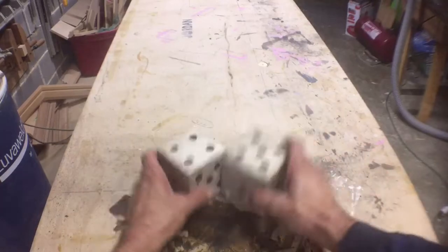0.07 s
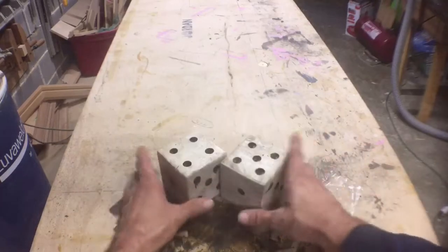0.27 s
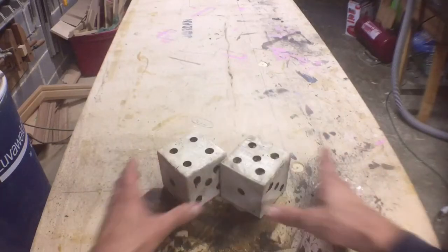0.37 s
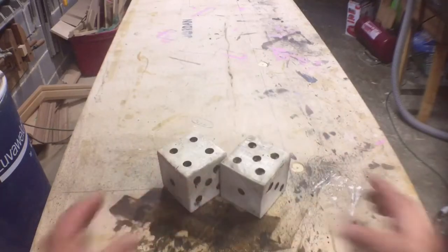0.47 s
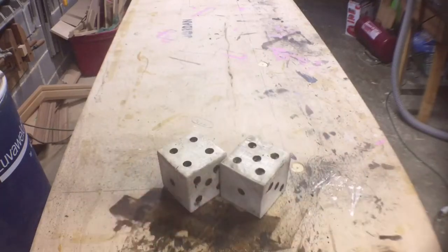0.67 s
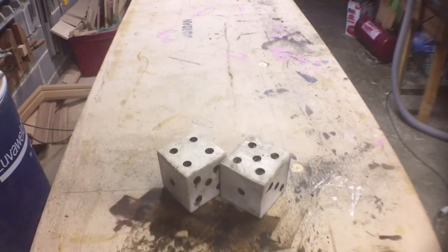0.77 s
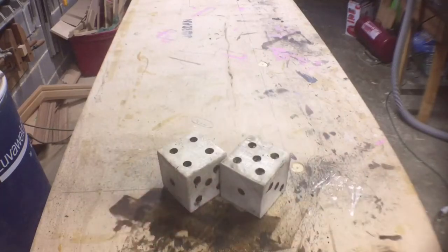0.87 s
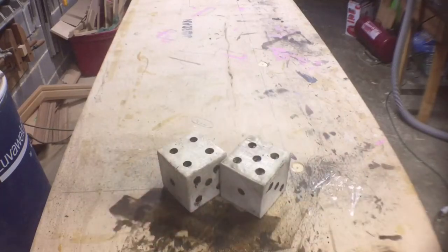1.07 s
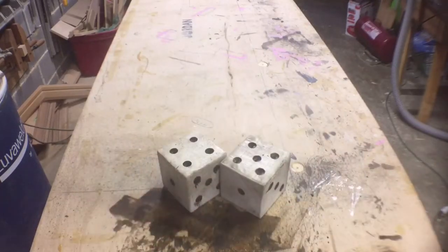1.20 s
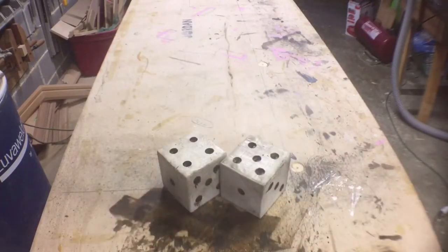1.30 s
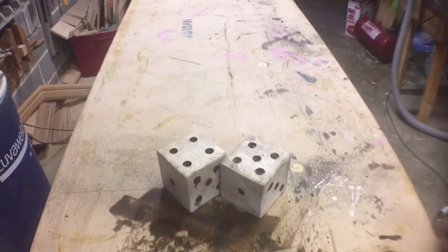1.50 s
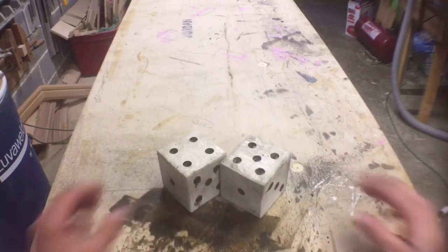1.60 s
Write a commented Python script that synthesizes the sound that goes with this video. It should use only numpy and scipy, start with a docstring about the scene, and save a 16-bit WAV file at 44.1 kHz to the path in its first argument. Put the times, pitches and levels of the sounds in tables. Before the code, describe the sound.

Two large wooden dice land on a bench with a sharp, briefly rattling knock.

```python
"""A small workshop: two big wooden dice are set down hard on a bench, one just after the other.
A sleeve brushes, edges touch and scuff, then the dice land and rattle flat. Each contact clacks the
blocks, booms the bench top and briefly rings the room; the peaks overload the microphone.
Soft bumps follow as the hands leave, over faint rustle, rumble, hiss, hum and a thin whine."""
import sys
import numpy as np
from scipy import signal
from scipy.fft import rfft, irfft
from scipy.io import wavfile

SR = 44100
rng = np.random.default_rng(int(sys.argv[2]) if len(sys.argv) > 2 else 0)


def unload_wav(signal):
    """Save mono or channel-first audio to the path in sys.argv[1] as 16-bit WAV at rate SR, clipped to [-1, 1]."""
    wavfile.write(
        sys.argv[1],
        SR,
        np.round(np.clip(np.atleast_2d(signal).T, -1, 1) * 32767).astype(np.int16),
    )


N = 72765

# Noise spectra. Each row: frequency in Hz, relative density in dB.
RUMBLE_SPECTRUM = [(20, -7), (55, 3), (120, 0.5), (200, -8.5), (350, -17), (600, -19.5), (1100, -26.5),
                   (3000, -32.5), (4200, -22.5), (5200, -43.5), (16000, -49.5)]
HISS_SPECTRUM = [(100, -2), (2000, 3.5), (4200, -0.5), (6500, -3), (8000, -5.5), (10500, -6.5), (13000, 0),
                 (16000, -5.5)]
RUSTLE_SPECTRUM = [(60, -14.5), (200, -9.5), (360, 4), (520, -11.5), (800, -9), (1300, -19), (4200, -26),
                   (6000, -36), (16000, -53)]
SCUFF_SPECTRUM = [(60, -9), (200, 3.5), (800, -2), (1200, -10.5), (2300, -17), (3100, -11.5), (4500, -17),
                  (5600, -24.5), (7500, -41), (16000, -48.5)]
# Noise envelopes. Each row: time in seconds, level in dB.
RUMBLE_ENVELOPE = [(0, -60), (0.751, -56.5), (.93, -59.5), (1.02, -59), (1.65, -59)]
HISS_ENVELOPE = [(0, -63.5), (0.199, -62.5), (0.449, -62.5), (.6, -57.5), (0.69, -58.5), (0.699, -68),
                 (1.52, -68), (1.63, -63.5)]
RUSTLE_ENVELOPE = [(0, -73), (.101, -71.5), (.68, -61), (.8, -75), (.9, -75.5), (1.05, -64.5),
                   (1.181, -71.5), (1.28, -68), (1.46, -64), (1.54, -76), (1.63, -67)]
SCUFF_ENVELOPE = [(.181, -71), (0.185, -40.5), (.2, -46.5), (.212, -43), (.226, -34.5), (0.239, -73)]
# Whine pitch. Each row: time in seconds, frequency in Hz.
WHINE_PITCH = [(0, 4450), (.8, 4401), (1.65, 4374)]

# Dense ringing of early echoes, late reverb and blocks. Each row: frequency in Hz, T60 in seconds.
EARLY_DECAY = [(80, 0.59), (280, 0.3523), (600, 0.278), (1100, 0.2342), (3500, 0.1805), (7000, 0.3065),
               (14000, 0.07)]
LATE_DECAY = [(100, 0.36), (300, 0.9462), (1000, 0.66), (4000, 0.3691), (12000, 1.5)]
WOOD_DECAY = [(100, 0.094), (600, 0.013), (3000, .027), (10000, .013)]
# Their spectra. Each row: frequency in Hz, gain in dB.
EARLY_SPECTRUM = [(100, -3.5), (400, -6), (1200, -0.5), (4000, -5), (12000, -1)]
LATE_SPECTRUM = [(100, -20.5), (280, -26.5), (550, -31), (1100, -23.5), (4000, -23.5), (6000, -31.5),
                 (12000, -29)]
WOOD_SPECTRUM = [(30, -9.5), (110, 13), (270, 26.5), (650, 26), (800, 21.5), (1100, 24), (1900, 19),
                 (3100, 15), (4200, 17.5), (4900, 5), (6800, 3), (7700, -9.5), (13500, -4), (16000, -16)]

# Resonances. Each row: frequency in Hz, level in dB, T60 in seconds.
BUMP_MODES = [(100, -6.5, 0.062), (281.14, -10.5, 0.0624), (318.2, 4, 0.0362), (479.14, -12, 0.055),
              (633.9, -1.5, 0.031), (822, -27.5, 0.82), (978, 3, 0.0307), (1049, -18.5, 0.0196),
              (2077.3, -7, .028)]
TOUCH_MODES = [(310, -10.5, .03), (470, 2, 0.0057), (660, 0, .015), (846.07, -1, 0.0096),
               (1550, -5, 0.0098), (3030, -1, .011), (4564.6, -6, 0.023), (5240, -8.5, 0.0053),
               (6420, -12.5, .011)]
BENCH_MODES = [(61.007, -40, 0.66145), (95.5, -30.5, 0.3), (120.98, -33.5, .42), (175.7, -32.5, 0.42),
               (191.49, -31, 0.36), (260.4, -23, 0.18), (285.33, -20, .24), (329.45, -15.5, 0.23),
               (387.4, -17, .22), (414.18, -17.5, .18), (583.44, -22.5, 0.17), (692.15, -21, .19),
               (877.4, -25, 0.21), (985.9, -23.5, 0.1685)]
BLOCK_MODES = [(1083.6, -25, 0.23), (1087.7, -26.5, 0.1733), (1401, -22, 0.17), (1530, -24.5, .094),
               (1759.4, -27.5, .13), (2382, -19.5, 0.022), (3127, -18.5, .06), (3248, -14.5, 0.034),
               (3938.6, -28.5, .08), (4358, -23, .03)]

# Touches before landing, bumps after. Each row: start in seconds, low gain in dB, high gain in dB.
TOUCHES = [(.1817, -27.5, -28), (.1925, -32, -47.5), (.2165, -32, -48), (.2225, -23.5, -43)]
BUMPS = [(.5778, -40, -38.5), (.6325, -30, -38), (.778, -45, -62.5), (1.461, -51.5, -64)]
# Dice hitting the bench and each other.
# Each row: start in seconds, then thud, body, knock, clack and tick gains in dB.
CONTACTS = [(.2267, -11, -6.5, -1.5, 2.5, -0.5), (.2294, 2, 2, 1.5, -4, -4.5),
            (0.2371, 3, -1, 0.5, -1.5, -14.5), (0.247, -11.5, -2, 1.5, 8.5, -1),
            (0.2509, -5.5, 2.5, 3, 3.5, 2), (0.2538, 0.5, 1, 2.5, -10, -14.5),
            (0.2588, 1, 2, -0.06, -9, -10), (0.2622, 0.5, 2, -0.24, -4, -7),
            (.2692, 5.5, 2.5, -1.5, -8.5, -8.5), (0.2732, -1.5, -1.5, -5, -10.5, -14),
            (0.29, -8.5, -14.5, -14, -22.5, -25), (0.301, -14, -13.5, -13.5, -5, -19)]
# Frequencies of thud, body, knock, clack and tick in Hz.
CONTACT_BANDS_HZ = [220, 620, 1150, 3400, 10000]


def amp(db):
    """Decibels to gain."""
    return 10 ** (np.asarray(db) / 20)


def unit_rms(x):
    """Scales to RMS 1."""
    return x / np.sqrt(np.mean(x ** 2) + 1e-20)


def lookup(points, hz):
    """Interpolates a table over log frequency."""
    points_hz, values = np.transpose(points)
    return np.interp(np.log(hz + 1), np.log(points_hz + 1), values)


def add(mix, start_s, sound):
    """Mixes a sound in at start_s."""
    part = mix[round(start_s * SR):][:len(sound)]
    part += sound[:len(part)]


def colour(x, spectrum, size=4096):
    """Minimum-phase filter through (Hz, dB) points."""
    log_gain = np.log(amp(lookup(spectrum, abs(np.fft.fftfreq(size, 1 / SR)))))
    response = np.exp(np.conj(signal.hilbert(log_gain)))
    impulse = np.fft.ifft(response).real[:size // 2]
    return signal.fftconvolve(x, impulse)[:len(x)]


def shaped_noise(spectrum, envelope):
    """Coloured noise under a level curve."""
    level_db = np.interp(np.arange(N) / SR, *np.transpose(envelope))
    return amp(level_db) * unit_rms(colour(rng.standard_normal(N), spectrum))


def ring(modes, size=24576):
    """Decaying sines of a struck object."""
    t = np.arange(size) / SR
    return sum(amp(db - 60 * t / t60_s) * np.sin(2 * np.pi * hz * t) for hz, db, t60_s in modes)


def dense_ring(decay, size=32768, bands=14):
    """Countless modes: noise bands, each with its own T60 and its share of a unit click's energy."""
    t, hz = np.arange(size) / SR, np.fft.rfftfreq(size, 1 / SR)
    noise, out = rfft(rng.standard_normal(size)), np.zeros(size)
    edges_hz = np.geomspace(40, SR / 2, bands + 1)
    for low_hz, high_hz in zip(edges_hz, edges_hz[1:]):
        t60_s = lookup(decay, np.sqrt(low_hz * high_hz))
        band = irfft(noise * (hz >= low_hz) * (hz < high_hz)) * amp(-60 * t / t60_s)
        out += unit_rms(band) * np.sqrt(2 * (high_hz - low_hz) / SR / size)
    return out


def background(whine_db=-71, hum_hz=118, hum_db=-69):
    """Room rumble, hiss, a slightly sinking whine and electric hum."""
    t = np.arange(N) / SR
    rumble = shaped_noise(RUMBLE_SPECTRUM, RUMBLE_ENVELOPE)
    hiss = shaped_noise(HISS_SPECTRUM, HISS_ENVELOPE)
    whine_hz = np.interp(t, *np.transpose(WHINE_PITCH))
    whine = amp(whine_db) * unit_rms(np.sin(2 * np.pi * np.cumsum(whine_hz) / SR))
    hum = amp(hum_db) * unit_rms(np.sin(2 * np.pi * hum_hz * t))
    return rumble + hiss + whine + hum


def late_reverb(x):
    """The workshop's faint reverberant tail."""
    return signal.fftconvolve(x, colour(dense_ring(LATE_DECAY), LATE_SPECTRUM))[:N]


def early_echoes(delay_s=0.008):
    """Impulse response of the clutter around the bench, new for each spot struck."""
    echoes = colour(dense_ring(EARLY_DECAY, size=16384), EARLY_SPECTRUM)
    return np.pad(echoes, (round(delay_s * SR), 0))


def hand_rustle():
    """Low rustle of moving hands."""
    return shaped_noise(RUSTLE_SPECTRUM, RUSTLE_ENVELOPE)


def sleeve_swish(peak_s=0.1417, sigma_s=0.0168, centre_hz=4303, half_width_hz=320, level_db=-56.5):
    """Cloth brushes as the dice come down: a brief swell of narrow-band noise."""
    t, hz = np.arange(N) / SR, np.fft.rfftfreq(N, 1 / SR)
    band_gain = 1 / (1 + ((hz - centre_hz) / half_width_hz) ** 2)
    noise = irfft(rfft(rng.standard_normal(N)) * band_gain, N)
    swell = np.exp(-0.5 * ((t - peak_s) / sigma_s) ** 2)
    return amp(level_db) * unit_rms(noise) * swell


def edge_scuff():
    """An edge scrapes the bench between first touch and landing."""
    return shaped_noise(SCUFF_SPECTRUM, SCUFF_ENVELOPE)


def light_taps(events, modes, high_hz, rise_s, echo_db, low_hz=220):
    """Light contacts build up briefly, ring one set of modes and echo."""
    out, ringing = np.zeros(N), ring(modes)
    t = np.arange(len(ringing)) / SR
    ringing *= 1 - np.exp(-t / rise_s)
    for start_s, low_db, high_db in events:
        tap = colour(ringing, [(low_hz, low_db), (high_hz, high_db)])
        add(out, start_s, tap)
        add(out, start_s, amp(echo_db) * signal.fftconvolve(tap, early_echoes()))
    return out


def dice(snap_gain=0.95, snap_decay_s=0.0011):
    """Each contact cracks, rings the blocks and shakes the bench; edges are bright, faces dull."""
    out, modes = np.zeros(N), ring(BENCH_MODES) + ring(BLOCK_MODES)
    t = np.arange(len(modes)) / SR
    for start_s, *gains_db in CONTACTS:
        snap = rng.standard_normal(len(t)) * np.exp(-t / snap_decay_s)
        blow = snap_gain * unit_rms(snap) / np.sqrt(len(t))
        add(blow, 0, dense_ring(WOOD_DECAY, size=4096))
        add(blow, 0, early_echoes())
        contact = colour(blow, WOOD_SPECTRUM) + modes
        add(out, start_s, colour(contact, list(zip(CONTACT_BANDS_HZ, gains_db))))
    return out


def scene():
    """Mono mix of dice, handling sounds and room."""
    wood = light_taps(TOUCHES, TOUCH_MODES, high_hz=3000, rise_s=0.0005, echo_db=-5)
    wood += edge_scuff()
    wood += dice()
    wood += light_taps(BUMPS, BUMP_MODES, high_hz=1200, rise_s=0.00049, echo_db=-2.5)
    return (wood + late_reverb(wood) + sleeve_swish() + hand_rustle() + background())[None]


def record(dry):
    """Microphone: bass cut, soft overload, band limit."""
    low_cut_hz, high_cut_hz = 36, 16000
    drive_db, ceiling = -2, 0.9197
    highpass = signal.butter(2, low_cut_hz, "highpass", fs=SR, output="sos")
    lowpass = signal.firwin(401, high_cut_hz, window=("kaiser", 8), fs=SR)
    driven = signal.sosfilt(highpass, dry) * amp(drive_db)
    clipped = driven / (1 + (driven / ceiling) ** 6) ** (1 / 6)
    return signal.oaconvolve(clipped, lowpass[None], "same")


dry = scene()
out = record(dry)
unload_wav(out)
```